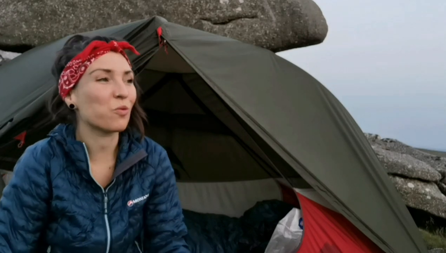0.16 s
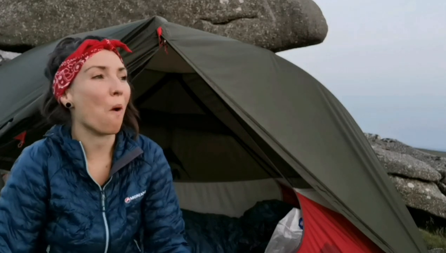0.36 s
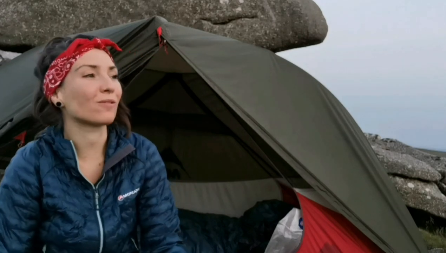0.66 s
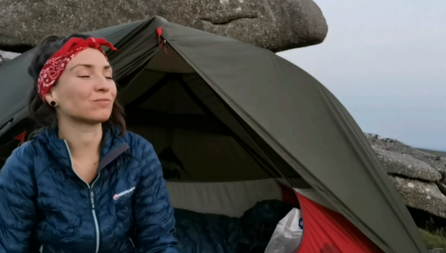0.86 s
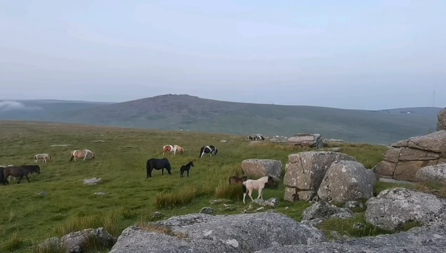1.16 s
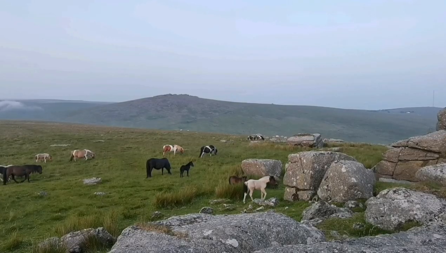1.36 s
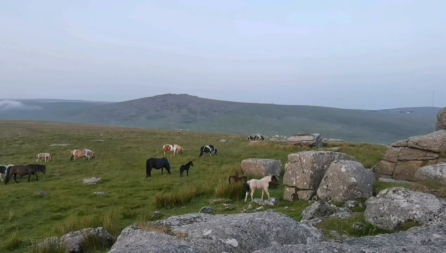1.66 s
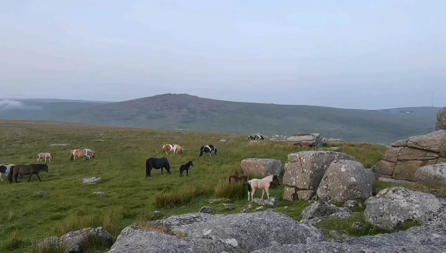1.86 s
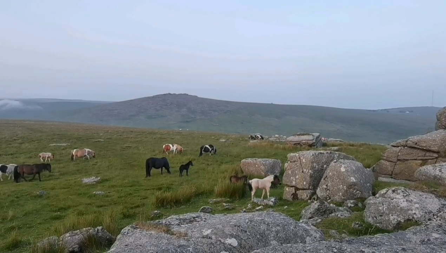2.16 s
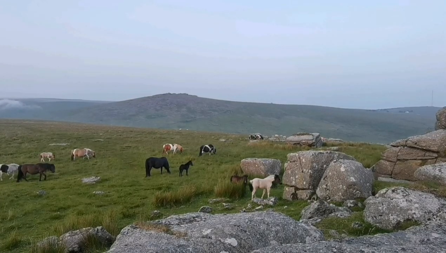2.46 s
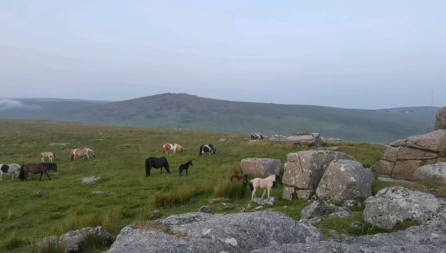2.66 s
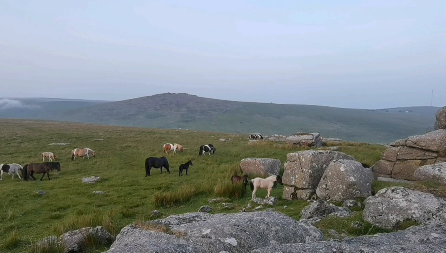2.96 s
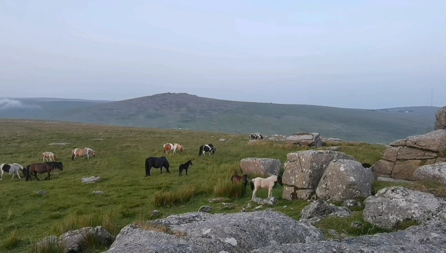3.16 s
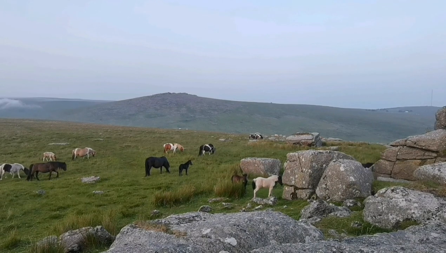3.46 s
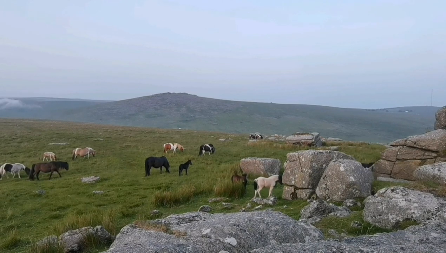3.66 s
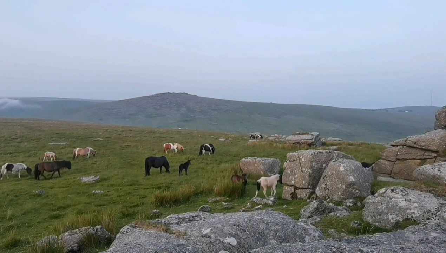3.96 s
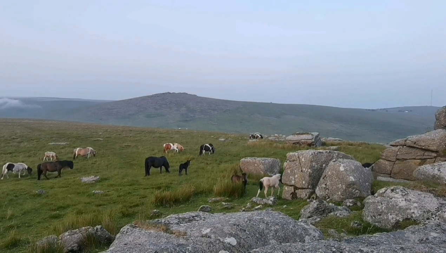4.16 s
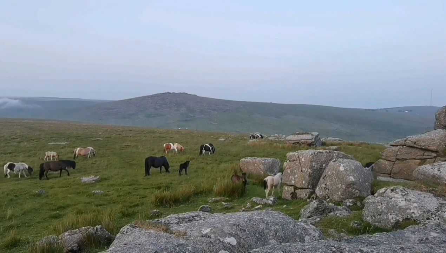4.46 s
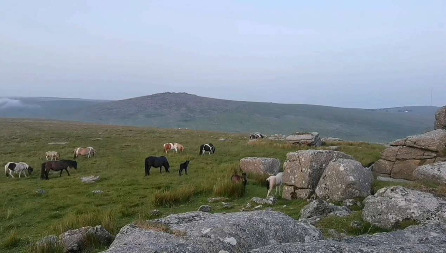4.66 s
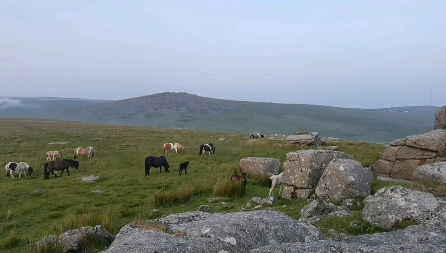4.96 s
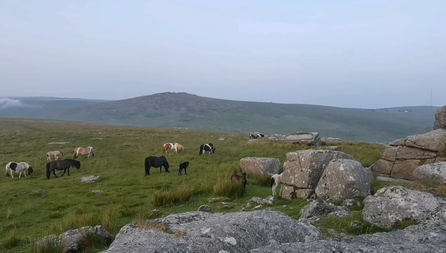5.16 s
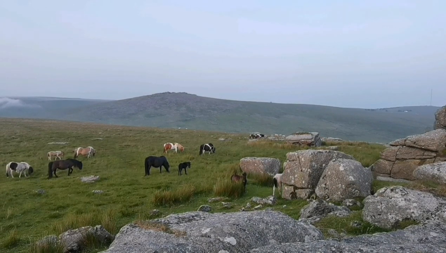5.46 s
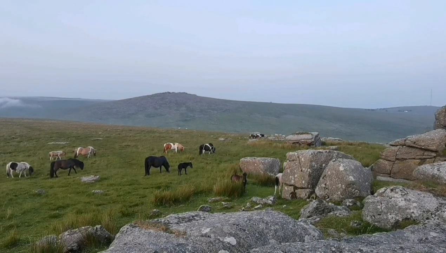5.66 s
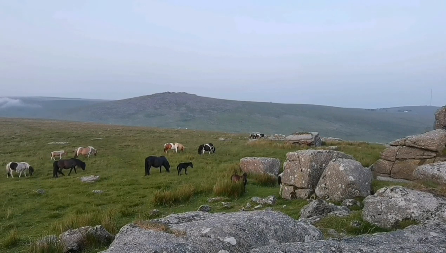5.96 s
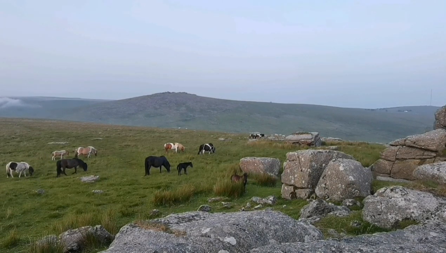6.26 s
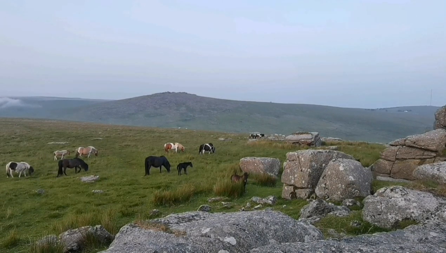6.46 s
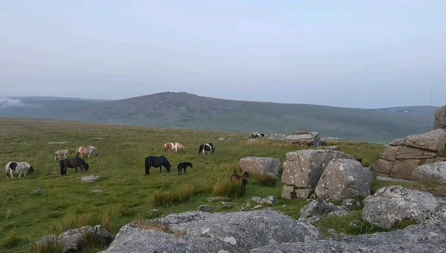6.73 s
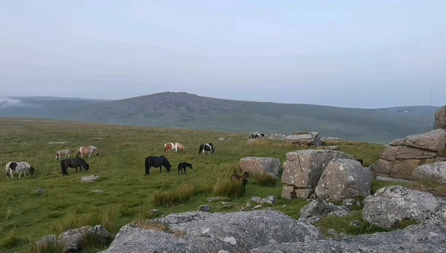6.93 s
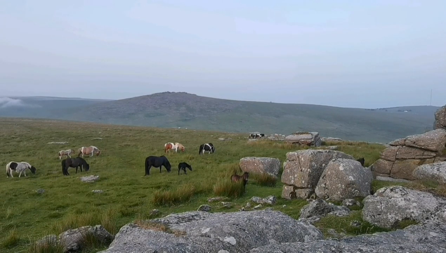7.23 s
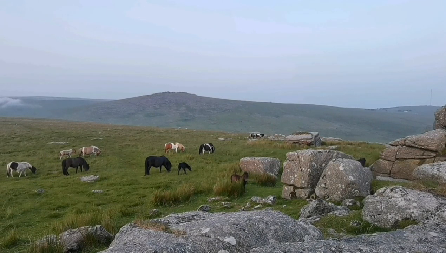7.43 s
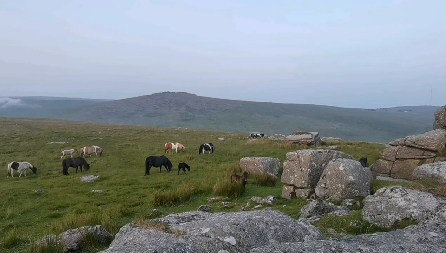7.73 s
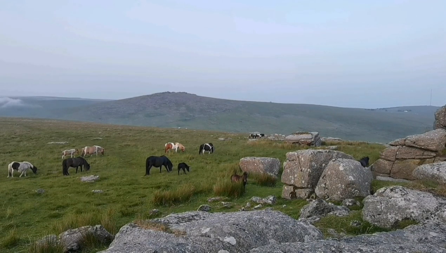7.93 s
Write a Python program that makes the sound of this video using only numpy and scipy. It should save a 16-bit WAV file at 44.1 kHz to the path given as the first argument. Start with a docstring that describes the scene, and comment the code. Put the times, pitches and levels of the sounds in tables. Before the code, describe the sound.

Close, crisp tent or jacket fabric snaps and rubs for about a second over a faint low wind drone, then stops dead. After a tiny gap, open moorland fades in: a near skylark slightly left chatters quick chips, buzzes and sliding whistles, others twitter farther away. Wind rumbles and flutters on the microphone, strongest early, with fine grass hiss.

```python
"""Skylarks over a windy moor

Thin fabric crinkles at a tent for about a second: snaps and rubs ring resonances over a low wind drone.
After a short silence the moor fades in. Larks near and far sing runs of tiny swept sine notes and gliding
whistles, with a short scattered echo. Shaped noise makes the wind's rumble and flutter on the microphone,
the open air and the swishing grass. Decaying low tones make bumps, band-passed noise makes brushes and
handling ticks, and one long, faint, wavering tone calls from far off."""
import sys
import numpy as np
from scipy import signal
from scipy.fft import rfft, irfft, next_fast_len
from scipy.io import wavfile

SR = 44100
rng = np.random.default_rng(int(sys.argv[2]) if len(sys.argv) > 2 else 0)


def log_audio(samples):
    """Write samples as a 16-bit WAV file to the path given in sys.argv[1]."""
    # one column per channel
    frames = np.atleast_2d(samples).T
    # limit to full scale, then quantise
    limited = np.clip(frames, -1, 1)
    pcm = np.round(limited * 32767).astype(np.int16)
    wavfile.write(sys.argv[1], SR, pcm)


N = 356769
TIME = np.arange(N) / SR  # s
TENT_END_S, MOOR_START_S = .94, 1.01
CUTOFF_HZ = 15900

# Levels in the tables are before any trims and filters in the functions.
# Fabric snaps: (start [s], level [dB], decay [s])
SNAPS = [(.002, -23.5, 0.011), (.0185, -30, 0.012), (.089, -33, .003), (.11, -30, 0.0063),
         (.192, -42, .002), (.2133, -11, .0006), (.53, -38.5, 0.0021), (.639, -41, 0.0042),
         (.6905, -23, 0.0022), (.7065, -34, 0.0013), (.7405, -32.5, 0.0017), (.766, -24, 0.0032),
         (.7845, -19, 0.0017), (.811, -29.5, 0.0035), (.848, -26.5, 0.0034)]
# Sliding creases: (peak [s], decay [s], level [dB], dullness [dB per octave])
RUBS = [(0.082, 0.041, -45.5, 8), (.196, 0.017, -54.5, 8), (0.363, 0.019, -53.5, 7),
        (.446, 0.0034, -60, 11), (0.694, 0.021, -39, 4.5), (0.719, 0.086, -42, -3),
        (0.865, 0.021, -53.5, 9.5)]
RUB_RISE_S, RUSTLE_FLOOR_DB = 0.014, -60.5
# Resonances of the fabric: (frequency [Hz], width [Hz], level [dB])
FABRIC_RESONANCES = [(1295, 700, -21.5), (2330, 320, -14.5), (3090, 680, -17), (5530, 1570, -10.5),
                     (9430, 590, 5), (11140, 1500, -3.5), (13700, 1300, -5)]
# Hollow drone of wind at the tent, swelling and arching in pitch: (time [s], frequency [Hz], level [dB])
DRONE = [(.03, 190, -73.5), (.35, 235, -55), (.52, 268, -60), (.92, 220, -59)]
# Colour of the low wind round the tent: (frequency [Hz], level [dB])
TENT_COLOUR = [(50, -11.5), (100, 3.5), (260, -5.5), (450, -14.5)]

# Colour of the steady air over the moor: (frequency [Hz], level [dB])
AIR_COLOUR = [(100, -17), (230, -11.5), (450, -14), (2800, -15), (5500, -13.5), (9000, -32.5)]
# Colour of the wind's flutter: (frequency [Hz], level [dB])
FLUTTER_COLOUR = [(55, -30), (85, 1), (140, -3.5), (290, -18), (600, -35.5), (1500, -73)]
# Colour of the wind's deep rumble: (frequency [Hz], level [dB])
DEEP_COLOUR = [(25, -23), (54, 3.5), (105, -5), (250, -44.5)]
# Steady wind on the microphone: (time [s], deep rumble level [dB], flutter level [dB])
BREEZE = [(1.25, -55.5, -62.5), (2.09, -58.5, -60.5), (2.7, -49.5, -65), (3.52, -72, -61.5),
          (4.75, -80, -56.5), (5.38, -81, -67.5), (8.09, -71.5, -64.5)]
# Buffets on the microphone: (peak [s], decay [s], deep rumble level [dB], flutter level [dB])
BUFFETS = [(1.112, 0.02, -43, -41), (2.409, 0.074, -66, -40), (2.53, 0.1, -45, -34),
           (2.768, 0.038, -59, -41), (3.24, 0.045, -45, -52.5), (4.248, 0.011, -72, -45.5),
           (4.489, 0.037, -56, -47.5), (4.739, 0.13, -63, -49.5), (6.39, 0.12, -62, -55.5),
           (6.8, 0.056, -61, -52)]
BUFFET_RISE_S = 0.039
# Colour of the grass hiss: (frequency [Hz], level [dB])
GRASS_COLOUR = [(3500, -14), (6600, -3), (7400, 1.5), (8700, 2.5), (10500, -8.5), (11700, -17.5),
                (16000, -20)]
# Swishes of the grass: (middle [s], length [s], rise [dB])
SWISHES = [(1.25, 0.24, 7), (1.47, 0.31, 9.5), (2.252, 0.16, 8.5), (2.964, 0.18, 13), (4.96, 0.15, 7.5),
           (6.35, 0.18, 5.5)]

# Trills have two paces: slow chips that flick upward, fast rattles and buzzes that flick downward.
CHIPS_PER_S, RATTLE_NOTES_PER_S, RATTLE_SINK_HZ_PER_S = 52, 90, 6100
# Sweep widths, scaled by the pace in trill(): a share of the pitch for wide notes, Hz for narrow ones
FLICK_SHARE, NARROW_SWEEP_HZ = 0.38, 764
# Near lark's slow chips on one pitch: (time [s], notes [count], pitch [Hz], level [dB])
CHIPS = [(1.098, 4, 4920, -49), (1.186, 3, 4580, -57.5), (1.271, 3, 4040, -56.5), (1.367, 6, 2790, -58.5),
         (1.612, 2, 5660, -48), (1.931, 1, 3320, -55), (2.756, 4, 4890, -49.5), (2.912, 3, 3950, -59),
         (3.56, 4, 3260, -59), (4.211, 1, 4640, -59), (4.372, 3, 3100, -54.5), (4.595, 3, 4740, -60),
         (5.55, 4, 3360, -51), (5.93, 6, 4370, -57.5), (6.45, 5, 4750, -59.5)]
# Near lark's fast buzzes on one pitch: (time [s], notes [count], pitch [Hz], level [dB])
BUZZES = [(1.23, 4, 5020, -51), (1.853, 6, 3300, -44.5), (2.312, 5, 5710, -51.5), (2.67, 7, 3700, -64.5),
          (3.012, 11, 2830, -54), (3.77, 8, 5380, -58), (7.075, 6, 5330, -60), (7.697, 6, 5630, -53)]
# Near lark's sinking rattles: (time [s], notes [count], first pitch [Hz], level [dB])
RATTLES = [(1.772, 7.1, 4550, -52), (1.963, 2, 3360, -42.5), (1.997, 3.8, 2710, -57), (2.1, 5.7, 4000, -57),
           (4.105, 5.1, 3250, -63), (4.31, 6.5, 3230, -65.5), (4.52, 5.3, 3230, -62),
           (7.988, 5.9, 3220, -65)]
# Near lark's free whistles that swoop or hold: (start [s], length [s], start pitch [Hz], end pitch [Hz], level [dB])
SWOOPS = [(1.572, 0.039, 4920, 5320, -43), (1.728, 0.075, 5350, 4800, -57),
          (2.137, 0.022, 6160, 4800, -40.5), (2.234, 0.017, 6310, 5070, -40),
          (2.38, 0.088, 5630, 4550, -47), (3.216, 0.046, 4900, 5450, -51.5), (4.017, 0.09, 3490, 3600, -64),
          (5.026, 0.28, 4190, 4060, -56), (5.08, 0.14, 3640, 3890, -64), (6.925, 0.086, 4740, 4730, -68)]
# Near lark's falling whistles, all sinking at one pace: (start [s], length [s], start pitch [Hz], level [dB])
SLURS = [(1.646, 0.021, 5080, -38.5), (1.674, 0.031, 4990, -40.5), (2.163, 0.064, 4470, -52),
         (2.464, 0.18, 4660, -58), (3.281, 0.022, 5100, -47.5), (3.308, 0.041, 4990, -47.5),
         (6.382, 0.061, 5100, -54), (7.146, 0.13, 4770, -57), (7.458, 0.13, 4740, -59),
         (7.802, 0.067, 4630, -67)]
SLUR_SINK_HZ_PER_S = 4100
SWOOP_SAG_HZ = 46  # how far a whistle bows below the straight glide at its middle
# Near lark's recurring phrase: (time [s], level [dB])
REFRAINS = [(4.706, -63), (5.076, -59.5), (5.453, -58), (5.84, -61), (6.253, -57.5), (6.626, -63.5)]
REFRAIN_HZ, REFRAIN_BUZZ_HZ, REFRAIN_FLICK_HZ = 4610, 3670, 4330
TUMBLE_FROM_HZ, TUMBLE_TO_HZ = 3230, 2426
BUZZ_AFTER_S, FLICKS_AFTER_S, CHIP_AFTER_S, TUMBLE_AFTER_S = .055, 0.125, .203, .216
# Second lark's whistles: (start [s], length [s], start pitch [Hz], end pitch [Hz], level [dB])
ANSWERS = [(1.305, 0.062, 5360, 5440, -60), (1.82, 0.065, 5050, 4670, -61.5),
           (2.353, .025, 2500, 3730, -56), (5.823, 0.024, 3130, 2620, -61.5)]
# Second lark's pips: (start [s], notes [count], pitch [Hz], level [dB])
PIPS = [(2.266, 2, 2540, -61.5), (2.471, 3, 2830, -59), (6.584, 4, 2940, -61), (6.659, 3, 2640, -68),
        (7.928, 2, 3090, -61.5)]

# Dull bumps on the microphone: (peak [s], frequency [Hz], level [dB])
BUMPS = [(1.116, 53.2, -26), (2.53, 144, -35.5), (4.251, 113.6, -43)]
BUMP_RISE_S, BUMP_DECAY_S = 0.015, 0.024
# Soft low brushing: (middle [s], length [s], level [dB])
BRUSHES = [(1.626, 0.28, -66), (2.005, 0.31, -67.5), (4.693, 0.37, -72)]
# Handling ticks: (start [s], level [dB], decay [s])
TICKS = [(6.508, -46, 0.0037), (6.5185, -41, 0.0011)]
# Far call, perhaps of cattle: (time [s], frequency [Hz], level [dB])
CALL = [(3.85, 494, -82), (4.05, 593, -75.5), (4.55, 608, -76.5), (5.0, 564, -80.5)]


def from_db(db):
    """Turn decibels into an amplitude factor."""
    return 10 ** (np.asarray(db) / 20)


def rms_one(x):
    """Scale a signal to an rms of 1."""
    return x / np.sqrt(np.mean(x ** 2) + 1e-20)


def in_time(rows):
    """Draw each column of a table as a curve over every sample."""
    s, *columns = np.transpose(rows)
    return [np.interp(TIME, s, column) for column in columns]


def add(out, start_s, sound):
    """Mix a sound in at its time."""
    at = max(int(start_s * SR), 0)
    out[at:at + len(sound)] += sound[:max(N - at, 0)]


def drift(rate):
    """Random curve: normal draws, rate per second, joined by straight lines."""
    count = int(N / SR * rate) + 2
    return np.interp(TIME * rate, np.arange(count), rng.standard_normal(count))


def swell(middle_s, length_s):
    """A smooth rise and fall around a moment."""
    return np.cos(np.pi * np.clip((TIME - middle_s) / length_s, -.5, .5)) ** 2


def surge(peak_s, rise_s, decay_s):
    """An envelope that swells to its peak and then dies away exponentially."""
    age = TIME - peak_s
    return np.exp(-(np.minimum(age, 0) / rise_s) ** 2 - np.clip(age / decay_s, 0, 20))


def bursts(rows):
    """The envelope of snaps that start at once and die in milliseconds."""
    out = np.zeros(N)
    for s, db, decay_s in rows:
        add(out, s, from_db(db) * np.exp(-TIME[:SR // 10] / decay_s))
    return out


def pan(pan_db):
    """Left and right gains that differ by pan_db; positive leans left."""
    return from_db([[pan_db / 2], [-pan_db / 2]])


def place(x, lag_s, pan_db):
    """A source to the left reaches the right microphone later and weaker."""
    delayed = np.interp(TIME - lag_s, TIME, x)
    return np.array([x, delayed]) * pan(pan_db)


def pair(alike):
    """White noise in two channels with a given likeness, rms 1."""
    mid, side = rng.standard_normal((2, N))
    alike = np.clip(alike, -1, 1)
    return rms_one(np.sqrt(1 + alike) * mid + np.sqrt(1 - alike) * side * [[1], [-1]])


def noise(colour, alike):
    """Stereo noise of a given spectrum, rms 1."""
    hz, db = np.transpose(colour)
    size = next_fast_len(N)
    bins = np.maximum(np.fft.rfftfreq(size, 1 / SR), 1)
    gain = from_db(np.interp(np.log(bins), np.log(hz), db))
    # beyond the table: 6 dB per octave down below it, 12 above it
    gain = gain * np.minimum(bins / hz[0], 1) * np.minimum(hz[-1] / bins, 1) ** 2
    return rms_one(irfft(rfft(pair(alike), size) * gain, size)[:, :N])


def band(x, low_hz, high_hz):
    """Keep only the band between two frequencies."""
    return signal.sosfilt(signal.butter(2, [low_hz, high_hz], "band", fs=SR, output="sos"), x)


def trill(notes, rate, first_hz, last_hz, note_s=0.0115, sweep_hz=900, turn_rate=66, vary_db=2, vary_hz=70):
    """A run of tiny swept notes, each a little different."""
    t = np.arange(int((notes / rate + note_s) * SR)) / SR
    # a positive sweep_hz flicks upward below turn_rate [notes per s] and downward above it
    sweep = sweep_hz * np.tanh((turn_rate - rate) / 20)
    out = np.zeros(len(t))
    for k, hz in enumerate(np.linspace(first_hz, last_hz, max(round(notes), 1))):
        age = np.clip(t - k / rate - note_s / 2, -note_s / 2, note_s / 2)  # 0 at the note's middle
        note_hz = hz + vary_hz * rng.normal()
        cycles = note_hz * age + sweep * age ** 2 / (2 * note_s) + rng.random()
        envelope = np.cos(np.pi * age / note_s) ** 2
        out += from_db(vary_db * rng.normal()) * envelope * np.sin(2 * np.pi * cycles)
    return out


def whistle(length_s, start_hz, middle_hz, end_hz, quiver_hz=60, quiver_rate=120, hook_hz=500, hook_s=0.00378):
    """One note that hooks up onto its pitch and glides along an arc, with a quick, uneven quiver."""
    along = np.linspace(0, 1, int(length_s * SR))
    age = along * length_s
    draws = SR // 500
    unevenness = np.interp(age * quiver_rate, np.arange(draws), rng.standard_normal(draws))
    quiver = (1 + unevenness / 2) * np.sin(2 * np.pi * quiver_rate * age + unevenness)
    arc = np.polyval(np.polyfit([0, .5, 1], [start_hz, middle_hz, end_hz], 2), along)
    hz = arc + quiver_hz * quiver - hook_hz * np.exp(-age / hook_s)
    envelope = np.sqrt(np.abs(np.sin(np.pi * along)))
    return envelope * np.sin(2 * np.pi * np.cumsum(hz) / SR)


def glide(length_s, start_hz, end_hz):
    """A whistle bowed slightly downward between two pitches."""
    return whistle(length_s, start_hz, (start_hz + end_hz) / 2 - SWOOP_SAG_HZ, end_hz)


def crinkle(level_db=1.0, grain_db=3.5, dull_db=5.0, pan_db=2):
    """Creases snap and slide, ringing the same resonances; each slide has its own dullness."""
    snaps = bursts(SNAPS) * pair(alike=0.18)
    rubs = [(from_db(RUSTLE_FLOOR_DB), dull_db)]  # a constant rustle under the rubs
    for s, decay_s, db, dull in RUBS:
        rubs.append((from_db(db) * surge(s, RUB_RISE_S, decay_s), dull))
    rustle = rms_one(from_db(grain_db * drift(700))) * pair(alike=0.57)
    out = 0
    for hz, width_hz, db in FABRIC_RESONANCES:
        # dullness tilts the rub about 9 kHz
        rubbing = sum(rub * from_db(dull * np.log2(9000 / hz)) for rub, dull in rubs)
        resonance = signal.iirpeak(hz, hz / width_hz, fs=SR)
        out = out + from_db(db + level_db) * signal.lfilter(*resonance, snaps + rustle * rubbing)
    return out * pan(pan_db)


def drone(width_hz=130):
    """A narrow band of low noise whose centre wanders: random curves ride on a gliding tone."""
    hz, db = in_time(DRONE)
    turn = 2 * np.pi * np.cumsum(hz) / SR
    return from_db(db) * (drift(width_hz) * np.cos(turn) + drift(width_hz) * np.sin(turn))


def tent_wind(level_db=-64):
    """Wind round the tent as steady low noise."""
    return from_db(level_db) * noise(TENT_COLOUR, alike=0.63)


def moor_air(level_db=-71):
    """Steady air over the moor as broad noise, nearly unrelated left and right."""
    return from_db(level_db) * noise(AIR_COLOUR, alike=0.06)


def wind(breeze_db=2, buffet_db=-1, lumpy_db=4.5, pan_db=2):
    """A breeze and sudden buffets drive deep rumble and flutter; eddies hit each microphone port on their own."""
    deep, flutter = from_db(breeze_db) * from_db(in_time(BREEZE))
    for s, decay_s, deep_db, flutter_db in BUFFETS:
        push = from_db(buffet_db) * surge(s, BUFFET_RISE_S, decay_s) * pan(pan_db)
        # independent noises add in power
        deep = np.hypot(deep, from_db(deep_db) * push)
        flutter = np.hypot(flutter, from_db(flutter_db) * push)
    lumps = from_db(lumpy_db * np.array([drift(20), drift(17)]))
    return lumps * (flutter * noise(FLUTTER_COLOUR, alike=0.18) + deep * noise(DEEP_COLOUR, alike=0.22))


def far_larks(level_db=-73, trill_share=.5, spread_db=3.5, low_hz=2650, high_hz=5300,
              lag_spread_s=0.00047, count=6):
    """More birds, each in its own direction, string trills and falling whistles together at random."""
    out = np.zeros((2, N))
    for lag_s in np.linspace(-1, 1, count) * lag_spread_s:
        song = np.zeros(N)
        for s in np.arange(MOOR_START_S, N / SR, .2):
            when, pitch, slope, pace, kind = rng.random(size=5)
            hz = low_hz + pitch * (high_hz - low_hz)
            end_hz = hz * (1 - 0.15 * slope)
            if kind < trill_share:
                phrase = trill(4 * (1 + pace), 48 * (1 + pace), hz, end_hz)
            else:
                phrase = whistle((1 + pace) / 20, hz, (hz + end_hz) / 2, end_hz)
            loudness = hz / np.sqrt(low_hz * high_hz)  # high notes are sung louder
            strength = from_db(level_db + spread_db * rng.normal()) * loudness
            add(song, s + when / 10, strength * phrase)
        out += place(song, lag_s, pan_db=0)
    return out


def scatter(x, t60):
    """Rocks and turf send back a thin, short tail: decaying noise, separate left and right."""
    t = TIME[:SR // 2]
    tail = rng.standard_normal((2, len(t))) * from_db(-60 * t / t60)
    return signal.fftconvolve(x, rms_one(tail) / np.sqrt(len(t)), axes=1)[:, :N]


def grass(level_db=-65, flicker_db=2.0, grain_db=2.02):
    """A fine, grainy hiss that swells in brief swishes."""
    rise = sum(db * swell(s, length_s) for s, length_s, db in SWISHES)
    level = level_db + rise + flicker_db * drift(20) + grain_db * drift(400)
    return from_db(level) * noise(GRASS_COLOUR, alike=0.99)


def near_larks(trill_db=2.0, whistle_db=-1, lead_s=.0058, flutter_db=2.5):
    """The nearest song, to the left, fluttering in the moving air."""
    trills, whistles = np.zeros((2, N))
    # lead_s puts the middle of a run's first note at its table time
    for rows, sing in ((CHIPS, chips), (BUZZES, buzz), (RATTLES, rattle)):
        for s, notes, hz, db in rows:
            add(trills, s - lead_s, from_db(db) * sing(notes, hz))
    for s, db in REFRAINS:
        add(trills, s - lead_s, from_db(db) * refrain())
    for s, *shape, db in SWOOPS:
        add(whistles, s, from_db(db) * glide(*shape))
    for s, length_s, hz, db in SLURS:
        add(whistles, s, from_db(db) * glide(length_s, hz, hz - SLUR_SINK_HZ_PER_S * length_s))
    song = from_db(trill_db) * trills + from_db(whistle_db) * whistles
    return place(song * from_db(flutter_db * drift(200)), lag_s=0.00048, pan_db=3.5)


def chips(notes, hz, sweep_share=0.15):
    """A slow run of short upward flicks on one pitch."""
    return trill(notes, CHIPS_PER_S, hz, hz, sweep_hz=sweep_share * hz)


def bumps(pan_db=7.0):
    """Dull thuds ring for a few cycles and reach both microphone ports together, stronger on the left."""
    thuds = np.zeros(N)
    for s, hz, db in BUMPS:
        thuds += from_db(db) * surge(s, BUMP_RISE_S, BUMP_DECAY_S) * np.sin(2 * np.pi * hz * (TIME - s))
    return thuds * pan(pan_db)


def buzz(notes, hz):
    """A fast run of narrow downward flicks on one pitch."""
    return trill(notes, RATTLE_NOTES_PER_S, hz, hz, sweep_hz=NARROW_SWEEP_HZ)


def second_lark(level_db=1):
    """Another bird, straight ahead, sings thin whistles and falling pips."""
    song = np.zeros(N)
    for s, *shape, db in ANSWERS:
        add(song, s, from_db(db) * glide(*shape))
    for s, notes, hz, db in PIPS:
        pips = trill(notes, CHIPS_PER_S, hz, hz, note_s=1 / CHIPS_PER_S, sweep_hz=-NARROW_SWEEP_HZ / 2)
        add(song, s, from_db(db) * pips)
    return from_db(level_db) * song


def handling():
    """Soft brushes and a double tick close to the microphone, as shaped bands of noise."""
    brushing = sum(from_db(db) * swell(s, length_s) for s, length_s, db in BRUSHES)
    brushes = brushing * rms_one(band(pair(alike=0.78), 390, 1530))
    ticks = bursts(TICKS) * rms_one(band(pair(alike=0.83), 2600, 11000))
    return brushes + ticks


def rattle(notes, hz):
    """A fast run of downward flicks, sinking as it goes."""
    sink_hz = RATTLE_SINK_HZ_PER_S * notes / RATTLE_NOTES_PER_S
    return trill(notes, RATTLE_NOTES_PER_S, hz, hz - sink_hz, sweep_hz=FLICK_SHARE * hz)


def far_call():
    """One long, wavering, faint tone."""
    hz, db = in_time(CALL)
    sounding = (TIME > CALL[0][0]) & (TIME < CALL[-1][0])
    tone = np.sin(2 * np.pi * np.cumsum(hz + 10 * drift(12)) / SR)
    return sounding * from_db(db + 2 * drift(54)) * tone


def refrain(buzz_db=-3, flicks_db=3, lone_db=5, tumble_db=-1.0):
    """The repeated phrase: three wide chips, a low rattle, two falling flicks, a lone chip and a low tumble."""
    out = np.zeros(SR)
    flicks = trill(2, CHIPS_PER_S, REFRAIN_FLICK_HZ, REFRAIN_FLICK_HZ,
                   note_s=1 / CHIPS_PER_S, sweep_hz=-NARROW_SWEEP_HZ * 2)
    tumble = trill(6, RATTLE_NOTES_PER_S, TUMBLE_FROM_HZ, TUMBLE_TO_HZ, sweep_hz=NARROW_SWEEP_HZ)
    add(out, 0, chips(3, REFRAIN_HZ, FLICK_SHARE))
    add(out, BUZZ_AFTER_S, from_db(buzz_db) * rattle(7, REFRAIN_BUZZ_HZ))
    add(out, FLICKS_AFTER_S, from_db(flicks_db) * flicks)
    add(out, CHIP_AFTER_S, from_db(lone_db) * chips(1, REFRAIN_HZ, FLICK_SHARE))
    add(out, TUMBLE_AFTER_S, from_db(tumble_db) * tumble)
    return out


def scene(echo_db=-9.5, fade_s=0.18):
    """The tent cuts off; after a short silence the moor fades in."""
    tent = crinkle() + drone() + tent_wind()
    near, far = near_larks() + second_lark(), far_larks()
    echo = scatter(from_db(echo_db) * (near + 2 * far), t60=0.19)  # far birds echo more
    moor = near + far + echo + grass() + moor_air() + far_call() + handling()
    fade_in = np.clip((TIME - MOOR_START_S) / fade_s, 0, 1)
    # the wind comes up sooner than the rest of the moor
    return tent * (TIME < TENT_END_S) + moor * fade_in ** 2 + wind() * np.sqrt(fade_in) + bumps()


def record(dry):
    """The top is cut steeply by an elliptic low-pass."""
    return signal.sosfilt(signal.ellip(10, .1, 70, CUTOFF_HZ, fs=SR, output="sos"), dry)


dry = scene()
out = record(dry)
log_audio(out)
```